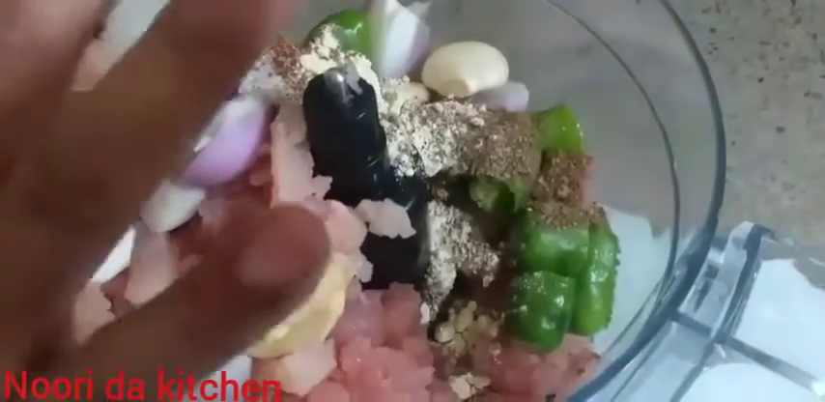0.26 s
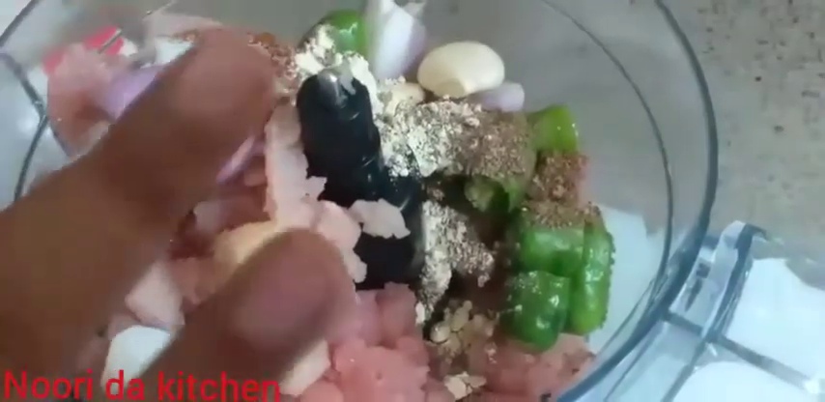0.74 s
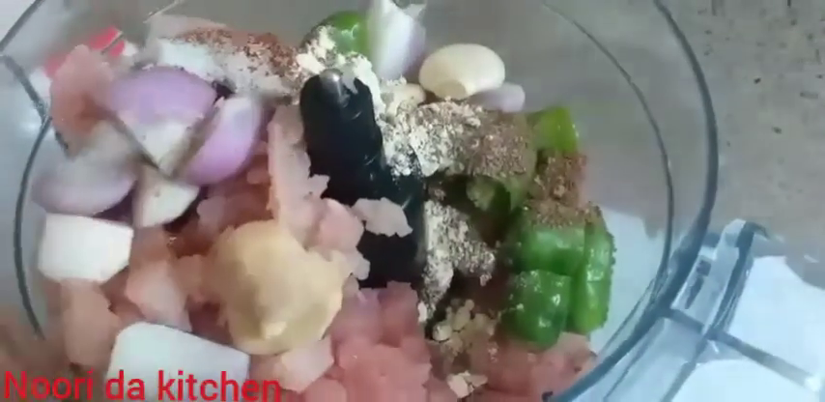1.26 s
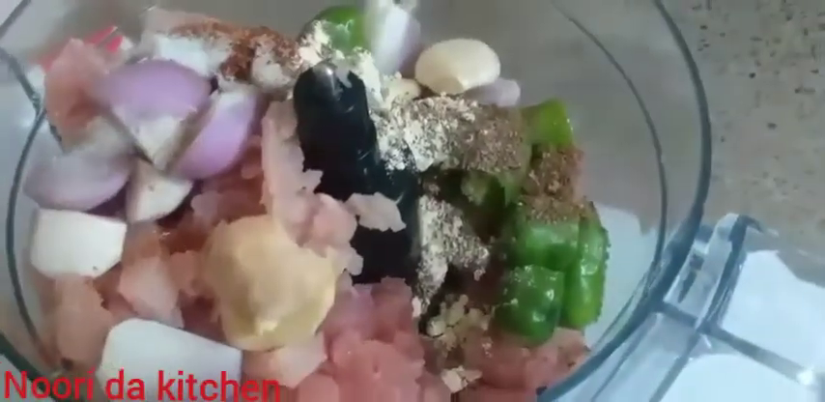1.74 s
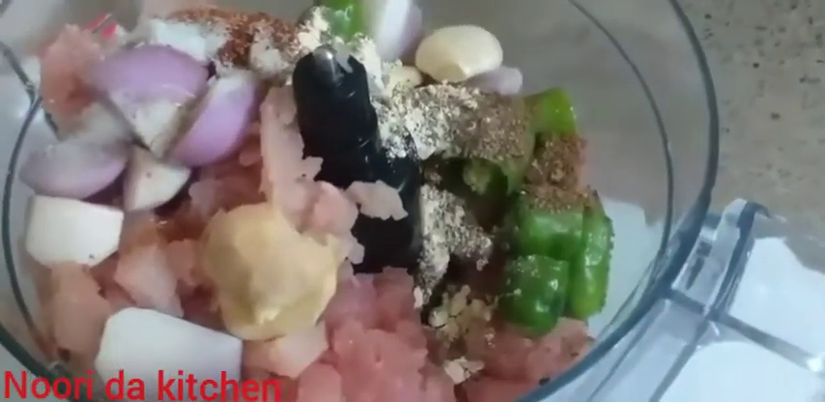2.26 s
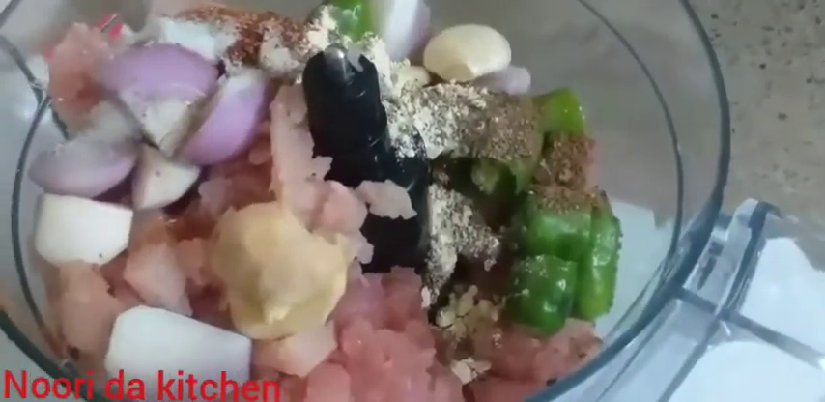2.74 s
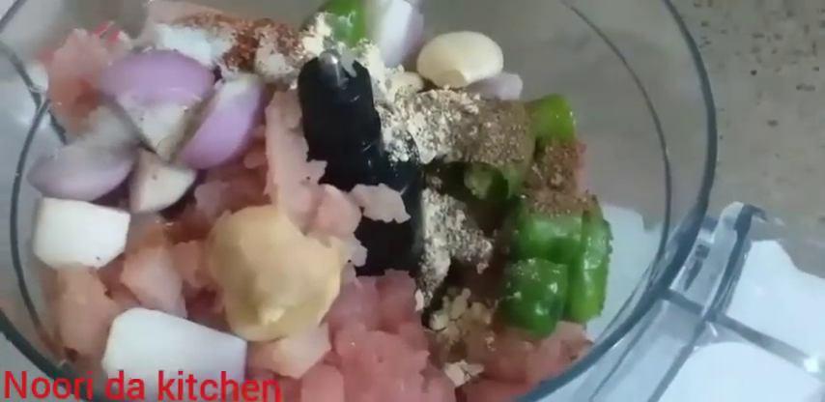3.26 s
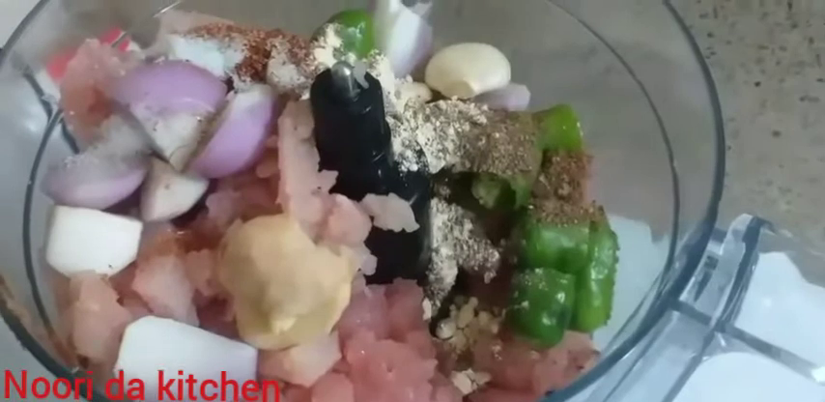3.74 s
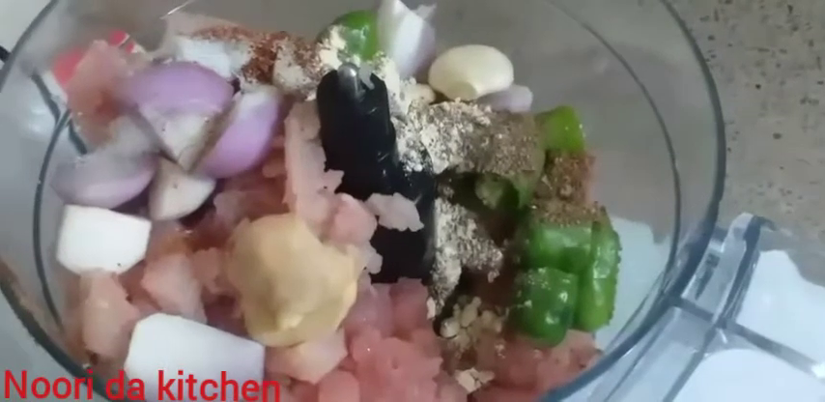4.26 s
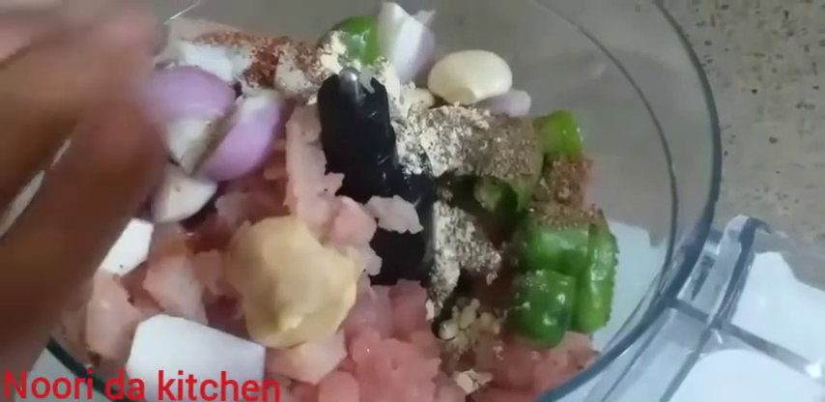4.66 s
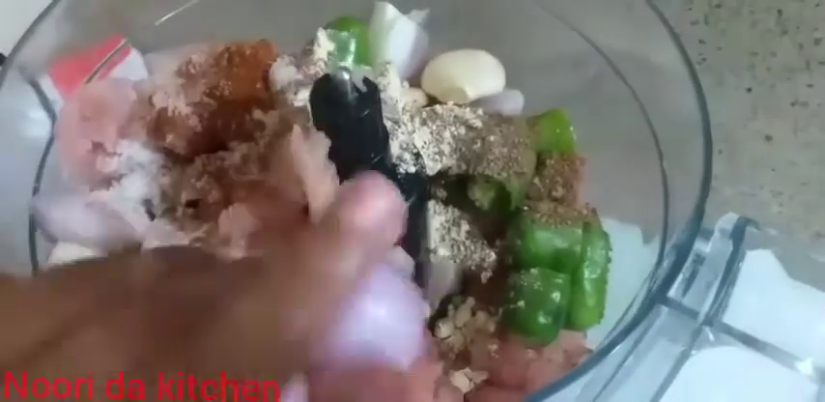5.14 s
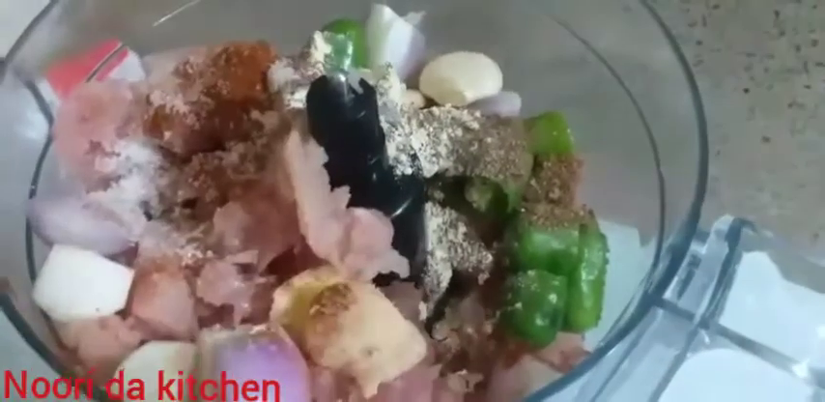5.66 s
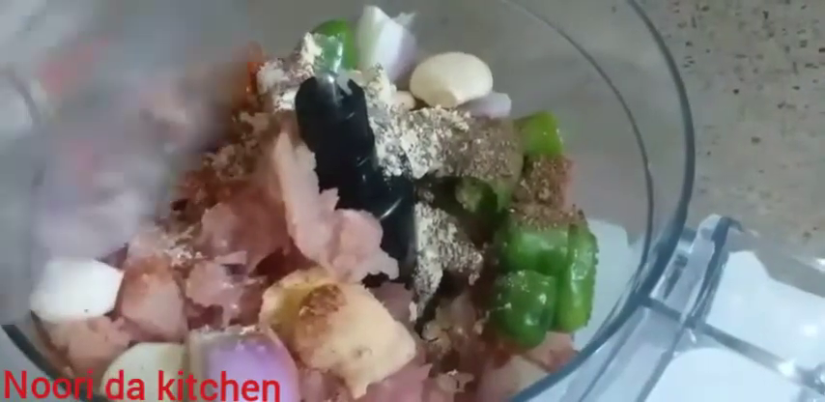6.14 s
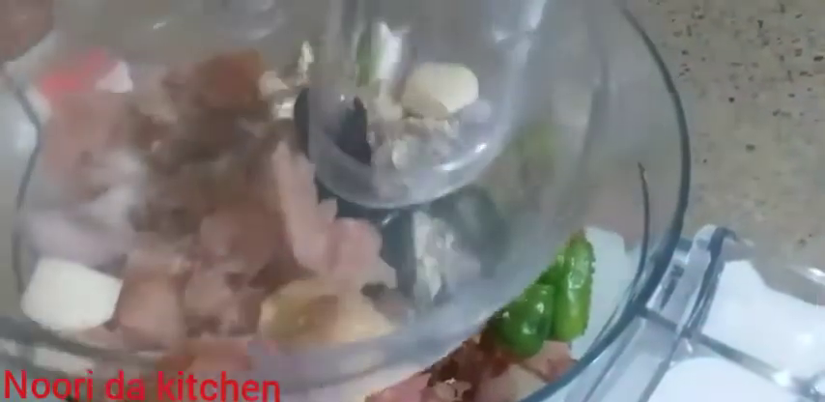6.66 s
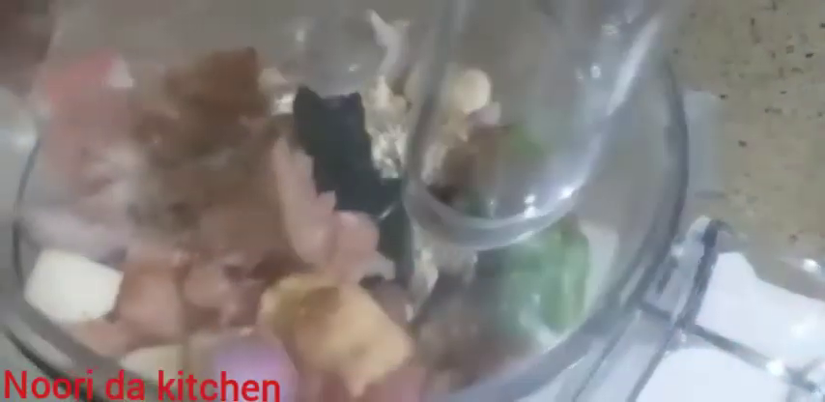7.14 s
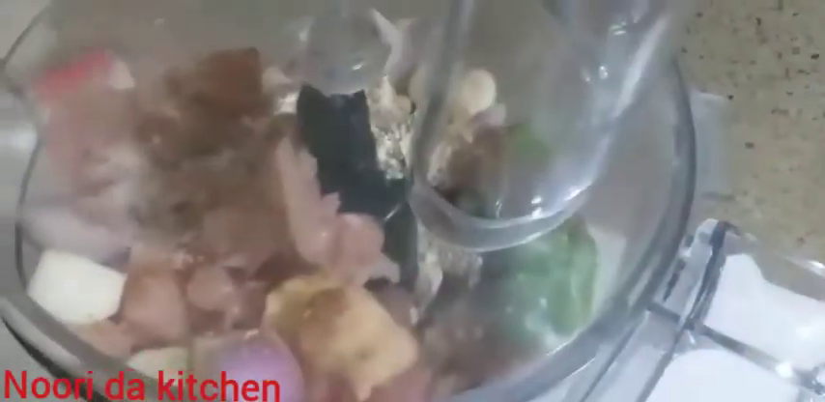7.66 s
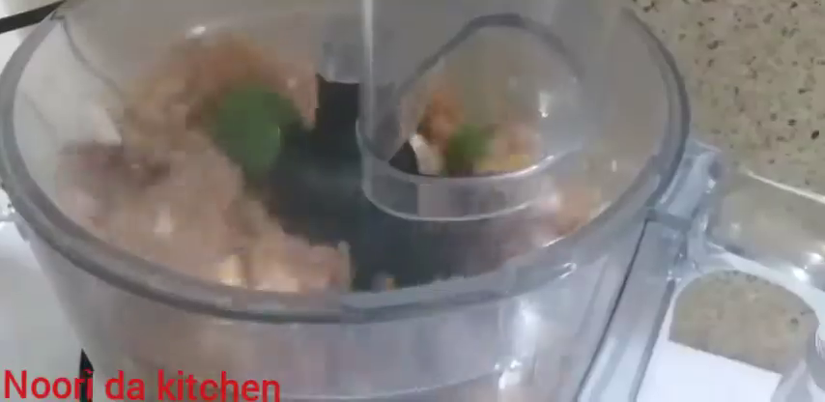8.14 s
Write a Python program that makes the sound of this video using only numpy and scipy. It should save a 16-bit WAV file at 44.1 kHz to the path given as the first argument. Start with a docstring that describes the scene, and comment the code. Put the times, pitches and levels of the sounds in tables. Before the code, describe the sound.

Fingers press wet chopped meat and onion, a dish and spoon clink, a plastic lid knocks shut, then a food processor motor roars.

```python
"""A food processor in a hard-walled kitchen, heard from just above its plastic bowl. After a brief silence the
scene changes to its motor running: shaft hum and gear tones under the noise roar of blades in food. Before the
change, fingers press wet meat and onion (crackle, rub, hollow plops), a dish and a spoon ring as decaying
modes, and noise bursts through resonances knock the lid shut. A small container slides on the counter over
filtered hiss, rumble and a distant engine's low tones."""
import sys
import numpy as np
from scipy import signal
from scipy.fft import rfft, irfft, next_fast_len
from scipy.io import wavfile
from scipy.ndimage import uniform_filter1d, minimum_filter1d, map_coordinates

SR = 44100
rng = np.random.default_rng(int(sys.argv[2]) if len(sys.argv) > 2 else 0)


def waveform_to_disk(signal):
    """Save audio, clipped to [-1, 1], as 16-bit WAV at the path in sys.argv[1]."""
    frames = np.transpose(np.atleast_2d(signal))
    scaled = np.clip(frames, -1, 1) * 32767
    samples = np.round(scaled).astype(np.int16)
    wavfile.write(sys.argv[1], SR, samples)


N = 370131  # samples

# Levels of spectra, modes and tones are relative within their table.
# roar of blades, gears and fan: pitch_hz, level_db
GRIND_SPECTRUM = [(290, -42.5), (500, -35.5), (678, -11.5), (773, -12), (1060, -2.5), (1210, -8.5),
                  (1690, -1.5), (1930, -4), (2850, -1.5), (3290, -1.5), (3700, 1), (5800, 1.5),
                  (8580, -35.5), (15100, -29), (16000, -25)]
# noise of the shaken housing: pitch_hz, level_db
HOUSING_SPECTRUM = [(24, -62), (40, -36.5), (108, -10), (167, -10), (209, -1), (324, -9.5), (382, -9),
                    (467, -14), (680, -12.5), (800, -38), (1040, -15), (1760, -120)]
# motor and gear tones: pitch_hz, level_db
WHINE_TONES = [(1130, -38), (1830, -35), (2347, -36), (2912, -35), (3268, -38), (3709, -33), (3941, -32),
               (4210, -30), (4479, -35), (5103, -34), (5270, -36), (5480, -36), (5518, -33), (5744, -32),
               (5814, -34), (5900, -33), (6019, -33), (6288, -40)]
# the shaft shakes harder as it takes up the load: start_s, hold_s, level_db
LOAD_SURGES = [(8.07, 0.12, -31)]
SHAFT_HZ, SHAFT_DB, GRIND_DB, WHINE_DB = 207.2, -37.5, -13, 1
SILENCE_S, MOTOR_IN_S = 7.992, 8.0232  # all handling sound stops; after a brief silence the scene changes to the running motor

# fingers pressing the food: start_s, hold_s, squelch_db, push_db, plop_db (relative levels)
PRESSES = [(0.432, 0.035, -39.5, -58, -73), (0.593, 0.036, -41.5, -51, -46.5),
           (0.742, 0.032, -35.5, -44.5, -45), (0.829, 0.058, -44, -58, -67), (0.918, 0.027, -45, -57, -53),
           (1.021, 0.063, -48, -50.5, -47.5), (1.12, .02, -39.5, -54, -47), (1.192, 0.016, -36.5, -55, -42),
           (4.938, 0.022, -47.5, -68, -55.5), (5.021, 0.039, -44, -50.5, -50),
           (5.134, 0.018, -41, -62, -58), (5.163, 0.043, -33, -41, -53), (5.212, .03, -34, -40, -33.5),
           (5.288, 0.091, -37.5, -46, -48), (5.421, .1, -34.5, -52, -46.5),
           (5.565, 0.01, -28.5, -46, -33.5), (5.639, 0.042, -51, -69, -57), (5.871, .05, -37.5, -66, -74),
           (6.323, .03, -36.5, -79, -80), (6.541, .01, -37, -50, -60)]
# crackle of wet food, also the grit under the container: pitch_hz, level_db
SQUELCH_SPECTRUM = [(350, -42.5), (600, -10), (625, -17.5), (790, -21.5), (894, -7), (970, -18),
                    (1210, -13), (2800, -12.5), (3340, -6.5), (5950, 2.5), (8740, -27), (16000, -21)]
# resonances of the air in the bowl: pitch_hz, width_hz, level_db
CAVITY_MODES = [(272, 310, -18.5), (554, 17, 4), (925, 25, -30.5), (1046, 11, -19.5)]
PRESS_ATTACK_S, PRESS_RELEASE_S = 0.023, 0.084  # rise, and fall by 60 dB
# the lid pushing air into the bowl: start_s, level_db
LID_PUFFS = [(6.585, -27), (6.919, -25.5), (6.940, -23.5)]
OPEN_HZ, CLOSED_HZ = 565.7, 440  # the bowl's air resonance without and with the lid
LID_ON_S = 6.8

# the lid knocking on the bowl: start_s, body_db, click_db
LID_KNOCKS = [(6.551, -24, -23.5), (6.607, -31, -17.5), (6.758, -37, -33), (6.882, -42.5, -34.5),
              (6.9191, -28, -26), (7.01, -21, -19), (7.023, -36, -26.5), (7.375, -47, -33.5),
              (7.403, -42, -36)]
# the lid juddering along the rim: start_s, length_s, body_db, click_db
LID_TWISTS = [(6.567, .03, -30.5, -37.5), (6.957, .042, -25, -26.5)]
# time from slip to slip, its scatter as a share, scatter in strength
SLIP_S, SLIP_SCATTER, SLIP_SCATTER_DB = .011, .2, 1.5
# the lid hits its stop and jolts the whole machine: start_s, hold_s, level_db
LOCK_JOLTS = [(7.013, 0.01, -31.5)]
# noise of that jolt: pitch_hz, level_db
JOLT_SPECTRUM = [(25, -39), (65, -9), (115, 5), (190, -5), (300, -29), (900, -84)]
# colour of plastic knocks: pitch_hz, level_db
PLASTIC_SPECTRUM = [(35, -60), (60, -28), (113, -4), (172, -13), (294, -4), (338, -20), (427, -6.5),
                    (785, -11.5), (1660, -2), (1820, -10.5), (2470, -14.5), (2710, -12.5), (6280, -6),
                    (9350, -37), (16000, -32.5)]
# resonances of the lid: pitch_hz, width_hz, level_db
LID_MODES = [(301.4, 21, 1.5), (446, 50, -1.5), (966, 78, 6), (1205, 33, 9), (1316, 65, 3.5), (1624, 32, 2),
             (2150, 31, -11), (2336, 24, 4.5), (2517, 41, 4), (3300, 32, 12.5), (3800, 75, -16)]
THUD_LOW_HZ = 225  # the light lid alone gives no deeper sound

# the dish touching down: start_s, level_db, low_db (added to its modes under 4 kHz)
DISH_CLINKS = [(2.032, -16, -6.5), (2.0451, -10, 2.5), (2.061, -20.5, 7.5), (2.115, -27, -9),
               (2.191, -26.5, -4), (2.1973, -21, -9), (2.2403, -24.5, 2), (2.2671, -25, -11),
               (2.463, -21.5, -5), (2.477, -16, -3), (2.609, -26, 0)]
# the spoon dropping: start_s, level_db
SPOON_DROPS = [(2.687, -20.5), (2.692, -13.5)]
# free modes of dish and spoon, before the damping factor: pitch_hz, width_hz, level_db
DISH_MODES = [(1206, 19, -6.5), (1830, 8.7, -7), (2215, 44, -12.5), (2834, 37, 1), (3526, 68, -4.5),
              (4270, 73, -23), (4540, 46, -6), (4886, 73, 5.5), (5810, 78, -8), (5680, 100, -23.5),
              (6210, 56, -1.5), (6660, 50, -5.5), (7670, 170, -33), (9630, 58, -28.5), (11400, 37, -42),
              (11000, 210, -41)]
SPOON_MODES = [(1807, 47, -10.5), (2252, 15, -5), (2932, 37, -16.5), (3210, 26, -5), (3477, 54, 1),
               (4565, 45, -0.5), (4600, 35, -9), (5300, 38, -16), (6050, 13, 3.5), (6230, 38, -14.5),
               (6610, 190, -3.5), (9100, 59, -27.5)]
# the dish's faint top partials: pitch_hz, width_hz, level_db
DISH_SPARKLE = [(7680, 81, 9), (8400, 36, -4.5), (9720, 39, -7), (10700, 37, -15.5), (11700, 61, -4),
                (14000, 60, -6)]
# the spoon's longest partials: pitch_hz, width_hz, level_db
SPOON_SUSTAIN = [(3350, 5.4, 3), (4460, 2, -1.5), (6100, 7, -8.5)]
# noise at the contact: pitch_hz, level_db
CLASH_SPECTRUM = [(59, -58.5), (100, -25.5), (255, -14), (648, -19), (1170, -7.5), (2000, -9.5),
                  (2220, -8.5), (2630, -6.5), (3540, -9), (4110, -5), (4870, 2), (5420, -9), (6290, -11),
                  (7610, -25.5), (16000, -43)]
SPOON_RATTLE_DB, DISH_RATTLE_DB = -16, -16  # each one shaken by a blow of the other
PRESS_HZ_PER_S = 210  # the dish's pitch rises as it is pressed onto the counter
# the dish's rim grinding round: start_s, hold_s, level_db
RIM_ROLLS = [(2.51, 0.024, -29), (2.67, 0.017, -33.5)]
# resonances of the grinding rim: pitch_hz, width_hz, level_db
RIM_MODES = [(1320, 120, 1), (1562, 74, 0)]

# hard taps, the last one the switch: start_s, peak_db (before the room), pitch_hz, width_hz, room_db
TAPS = [(0.14, -14.5, 1986, 990, -4), (0.14, -18.5, 5550, 4500, 1), (1.211, -27.5, 2280, 2490, -5.5),
        (7.9632, -24, 3610, 1300, -32)]
# wet pieces snapping: start_s, peak_db (before the room)
SNAPS = [(1.137, -30.5), (1.420, -33.5), (1.4787, -28.5), (4.748, -24), (5.329, -22.5), (5.486, -25),
         (5.5651, -15.5), (5.807, -19), (5.822, -18.5), (5.896, -28)]
SNAP_HZ, SNAP_WIDTH_HZ, SNAP_ROOM_DB = 5620, 4100, -6.5
# a thin container sliding over the counter: start_s, hold_s, level_db
SLIDES = [(4.096, 0.062, -40), (4.24, .01, -45)]
# resonances of its wall: pitch_hz, width_hz, level_db
CONTAINER_MODES = [(956, 15, 10.5), (1270, 51, -5), (2476, 56, 0.5), (3710, 50, 6), (5480, 36, 2),
                   (6900, 91, 3.5)]

# room background: start_s, hiss_db, rumble_db
FLOOR_LEVELS = [(0, -48.5, -56), (1.4, -50.5, -62.5), (2.3, -53, -65), (3.2, -57.5, -76.5),
                (3.6, -59, -70.5), (4.1, -52, -60), (6.2, -50.5, -63), (7.3, -50.5, -52.5),
                (7.9, -53, -63.5)]
# colours of the hiss and the rumble: pitch_hz, level_db
HISS_SPECTRUM = [(180, -32.5), (300, -11.5), (337, -21), (385, -20), (519, -32.5), (725, -11.5),
                 (1230, -19), (1510, -7), (2140, -15.5), (3640, 0.5), (3950, -4), (5160, 0.5), (6850, -6),
                 (9240, -35), (16000, -10.5)]
RUMBLE_SPECTRUM = [(15, -71), (25, -25.5), (114, 2.5), (183, -12.5), (245, -9), (339, -24.5), (452, -22),
                   (500, -21), (650, -59), (1100, -120)]
# a distant engine idling: start_s, firing_hz, fourth_order_db, fifth_order_db
ENGINE_DRONE = [(0, 24.65, -69, -53.5), (.3, 24.74, -82, -46.5), (1.0, 26, -56.5, -69.5),
                (1.9, 26, -57.5, -65.5), (2.7, 25.8, -73.5, -72.5)]
# the engine's weaker orders: multiple of firing_hz, level_db (against the stronger of the two main orders)
ENGINE_ORDERS = [(6, -9), (9, -12.5), (10, -8.5)]
# decay of the kitchen's reverberation: pitch_hz, t60_s
KITCHEN_DECAY = [(150, 1), (400, 0.87), (1000, 0.97), (2800, 0.89), (7000, 0.42), (14000, 0.51)]
# stereo side signal against the mid: pitch_hz, level_db
STEREO_WIDTH = [(100, -50), (2500, -71.5), (5000, -65.5), (7000, -45), (9000, -29), (13000, -37.5)]
TOP_HZ = 15900  # band limit


def amp(db):
    """Decibels to a linear gain."""
    return 10 ** (np.asarray(db) / 20)


def unit(x):
    """Scaled to rms 1."""
    return x / np.sqrt(np.mean(x ** 2) + 1e-20)


def onset_unit(x, size=660):
    """Scaled to rms 1 over its first 15 ms."""
    return x / np.sqrt(np.mean(x[:size] ** 2) + 1e-20)


def clock(count):
    """Time in seconds of each sample."""
    return np.arange(count) / SR


def along(points, hz):
    """(Hz, value) points read on a log frequency axis."""
    f, v = np.transpose(points)
    return np.interp(np.log(hz + 1), np.log(f + 1), v)


def curves(rows):
    """One value per sample for each column after the time."""
    s, *cols = np.transpose(rows)
    return [np.interp(clock(N), s, c) for c in cols]


def wobble(rate):
    """A smooth random curve, rate knots a second."""
    knots = rng.standard_normal(int(N * rate / SR) + 4)
    return map_coordinates(knots, [np.arange(N) * rate / SR], order=2)


def filtered(x, response):
    """x times a complex response of frequency."""
    m = next_fast_len(x.shape[-1] + 8192)
    return irfft(rfft(x, m) * response(np.fft.rfftfreq(m, 1 / SR)), m)[..., :x.shape[-1]]


def coloured(x, spectrum, size=2048):
    """x through a causal, minimum-phase filter with the given (Hz, dB) shape."""
    gain = amp(along(spectrum, np.fft.rfftfreq(size, 1 / SR)))
    cepstrum = irfft(np.log(gain + 1e-6))
    fold = np.r_[1, np.full(size // 2 - 1, 2), np.zeros(size // 2)]
    impulse = irfft(np.exp(rfft(cepstrum * fold)))
    return signal.oaconvolve(x, impulse)[:len(x)]


def resonant(x, peaks):
    """x through a body's (Hz, width, dB) resonances, summed with alternating signs."""
    def response(f):
        total = 0
        for k, (c, w, db) in enumerate(peaks):
            total = total + (-1) ** k * amp(db) * 1j * f * w / (c * c - f * f + 1j * f * w)
        return total
    return filtered(x, response)


def band(x, edges_hz, kind):
    """x through a third-order band or high-pass filter."""
    return signal.sosfilt(signal.butter(3, edges_hz, kind, fs=SR, output='sos'), x)


def noise(spectrum):
    """Unit-level noise with the given colour."""
    return unit(coloured(rng.standard_normal(N), spectrum))


def burst(t60, rise):
    """The chatter of one contact: noise that rises fast and dies 60 dB in t60 seconds."""
    t = clock(SR // 2)
    return rng.standard_normal(len(t)) * amp(-60 * t / t60) * (1 - np.exp(-t / rise))


def grains(rate, spread_db):
    """Random impulses of widely varying size, rate a second on average."""
    size = amp(spread_db * np.minimum(rng.exponential(size=N), 3))
    return (rng.random(N) < rate / SR) * rng.choice([-1, 1], N) * size


def ring(modes, shift_hz, scatter_db, damping, count=SR // 2):
    """Free ringing, with new mode strengths for every blow; wider modes die sooner."""
    t = clock(count).astype('float32')
    out = np.zeros(len(t))
    for hz, width, db in modes:
        swing = np.sin(float(2 * np.pi * (hz + shift_hz)) * t + 2 * np.pi * rng.random())
        decay = np.exp(-float(np.pi * damping * width) * t)
        out += width * amp(db + scatter_db * rng.normal()) * decay * swing
    return out


def strokes(rows, attack_s, release_s):
    """Gain of (s, hold s, dB) gestures: each swells up to its time, holds, and falls 60 dB over the release."""
    t, out = clock(N), np.zeros(N)
    for s, hold_s, db in rows:
        near = slice(*np.searchsorted(t, [s - attack_s, s + hold_s + release_s]))
        u = t[near] - s
        swell = np.minimum(1 + u / attack_s, 1) ** 2
        fall_db = -60 * np.maximum(u - hold_s, 0) / release_s
        out[near] = np.maximum(out[near], swell * amp(db + fall_db))
    return out


def add(track, s, x):
    """Mix x into the track at s seconds."""
    part = track[round(s * SR):][:len(x)]
    part += x[:len(part)]


def echo(x, wet_db):
    """x plus the kitchen's answer, each frequency dying at its own speed."""
    hz, t, z = signal.stft(rng.standard_normal(SR), SR, nperseg=256)
    decay = amp(-60 * t / along(KITCHEN_DECAY, hz)[:, None])
    tail = signal.istft(z * decay, SR, nperseg=256)[1]
    tail = tail * (1 - np.exp(-(clock(len(tail)) / 0.0028) ** 2))  # builds up over some milliseconds
    room = amp(wet_db) * tail / np.linalg.norm(tail)
    room[0] = 1  # the direct sound
    return signal.fftconvolve(x, room)[:N]


def motor():
    """The shaft hums and shakes the housing; gears whine over the roar of blades hitting food."""
    run = np.cumsum(1 + .0017 * wobble(14)) / SR  # the load nudges the speed of every tone alike
    whine = np.zeros(N)
    for hz, db in WHINE_TONES:
        whine += amp(db + 2 * wobble(12)) * np.sin(2 * np.pi * (hz * run + rng.random()))
    chop = unit(coloured(grains(rate=7000, spread_db=2.5), GRIND_SPECTRUM))
    roar = unit(noise(GRIND_SPECTRUM) + chop) * amp(1.3 * wobble(70))
    shake = amp(SHAFT_DB) + strokes(LOAD_SURGES, attack_s=.08, release_s=0.18)
    hum = shake * np.sin(2 * np.pi * SHAFT_HZ * run)
    housing = amp(-28.5) * band(noise(HOUSING_SPECTRUM), 60, 'high')
    running = clock(N) > MOTOR_IN_S
    return (amp(GRIND_DB) * roar + amp(WHINE_DB) * whine + hum + housing) * running


def food():
    """Wet pieces crackle and rub under each press of the fingers."""
    squelches = [(s, hold_s, db) for s, hold_s, db, _, _ in PRESSES]
    pushes = [(s, hold_s, db) for s, hold_s, _, db, _ in PRESSES]
    wet = strokes(squelches, PRESS_ATTACK_S, PRESS_RELEASE_S)
    push = strokes(pushes, PRESS_ATTACK_S, PRESS_RELEASE_S)
    crackle = unit(coloured(grains(rate=1000, spread_db=1.0), SQUELCH_SPECTRUM))
    crackle = crackle * amp(1.4 * wobble(45) - 3.0)
    rub = noise([(150, -9.5), (250, -1), (320, -1.5), (420, -13.5), (560, -13.5), (1200, -4)])
    rub = unit(resonant(rub, CAVITY_MODES))
    return echo(wet * crackle + amp(-2.5) * push * rub, wet_db=-3.5)


def bowl_air():
    """Each push of fingers or lid makes a hollow plop; the closed lid lowers its pitch."""
    out, t = np.zeros(N), clock(SR // 2)
    envelope = (1 - np.exp(-(t / 0.0063) ** 2)) * amp(-60 * t / 0.15)
    for s, *_, db in PRESSES + LID_PUFFS:
        hz = OPEN_HZ if s < LID_ON_S else CLOSED_HZ
        add(out, s, amp(db) * onset_unit(np.sin(2 * np.pi * hz * t) * envelope))
    return echo(out, wet_db=-12.5)


def slips():
    """A twisted lid sticks and slips at an uneven rate: rows like those of the knocks."""
    rows = []
    for start, length_s, body_db, click_db in LID_TWISTS:
        for k, (late, strong) in enumerate(rng.standard_normal(size=(8, 2))):
            if k * SLIP_S < length_s:
                s = start + SLIP_S * (k + SLIP_SCATTER * late)
                change_db = SLIP_SCATTER_DB * strong
                rows.append((s, body_db + change_db, click_db + change_db))
    return rows


def knocks():
    """Each knock is a hollow thud, a clack of the thin walls and a short bright click; locking adds a deep jolt."""
    jolt = strokes(LOCK_JOLTS, attack_s=.005, release_s=0.11) * noise(JOLT_SPECTRUM)
    out = echo(jolt, wet_db=-3)
    for s, body_db, click_db in LID_KNOCKS + slips():
        body = onset_unit(coloured(burst(t60=0.094, rise=0.0019), PLASTIC_SPECTRUM))
        body = body + amp(-2) * onset_unit(resonant(burst(t60=0.027, rise=0.0013), LID_MODES))
        thud = amp(body_db + 0.36) * onset_unit(band(body, [THUD_LOW_HZ, 940], 'band'))
        wall = amp(body_db - 0.9) * onset_unit(band(body, [750, 2700], 'band'))
        bright = band(coloured(burst(t60=0.031, rise=0.001), PLASTIC_SPECTRUM), 3100, 'high')
        click = amp(click_db) * onset_unit(bright)
        add(out, s, echo(thud + wall + click, wet_db=-5.5))
    return out


def clatter():
    """The dish, damped by the counter, rattles to rest; the spoon drops last and rings on."""
    out = np.zeros(N)
    seating = 1 - np.exp(-clock(SR // 2) / .0009)  # a rim meets the counter gradually
    blows = []  # start_s, dish_db, spoon_db, shift_hz, low_db
    for s, db, low_db in DISH_CLINKS:
        shift_hz = PRESS_HZ_PER_S * (s - DISH_CLINKS[0][0])
        blows.append((s, db, db + SPOON_RATTLE_DB, shift_hz, low_db))
    for s, db in SPOON_DROPS:
        blows.append((s, db + DISH_RATTLE_DB, db, 0, 0))
    for s, dish_db, spoon_db, shift_hz, low_db in blows:
        # glancing blows miss the low modes
        modes = [(hz, width, db + low_db * (hz < 4000)) for hz, width, db in DISH_MODES]
        dish = onset_unit(seating * ring(modes, shift_hz, scatter_db=3.5, damping=0.98))
        sparkle = onset_unit(seating * ring(DISH_SPARKLE, shift_hz, scatter_db=3, damping=1.3))
        dish += amp(-28) * sparkle
        spoon = onset_unit(seating * ring(SPOON_MODES, 0, scatter_db=0.5, damping=1.0))
        crack = onset_unit(coloured(burst(t60=.045, rise=.001), CLASH_SPECTRUM))
        crack = np.hypot(amp(dish_db), amp(spoon_db)) * crack
        hit = amp(dish_db) * dish + amp(spoon_db - 1.5) * spoon + amp(-5.5) * crack
        add(out, s, echo(hit, wet_db=-2.5))
        sustain = ring(SPOON_SUSTAIN, 0, scatter_db=1.5, damping=0.95, count=SR)
        add(out, s, amp(spoon_db - 12.0) * onset_unit(sustain))
    rim = unit(resonant(resonant(rng.standard_normal(N), RIM_MODES), RIM_MODES))
    return out + strokes(RIM_ROLLS, attack_s=0.034, release_s=0.46) * rim


def ticks():
    """Short taps and snaps, each a noise burst around one pitch; those close to the microphone are drier."""
    out = np.zeros(N)
    snaps = [(s, db, SNAP_HZ, SNAP_WIDTH_HZ, SNAP_ROOM_DB) for s, db in SNAPS]
    for s, db, hz, width_hz, room_db in TAPS + snaps:
        tone = [(hz, width_hz, 0)]
        snap = resonant(resonant(burst(t60=0.024, rise=0.0018), tone), tone)
        snap = coloured(snap, [(300, 8.5), (1500, 2.5), (6500, -3), (8700, -23.5), (16000, -5)])
        add(out, s, echo(amp(db) * snap / np.abs(snap).max(), wet_db=room_db))
    return out


def slide():
    """Gritty friction sets the container's wall singing."""
    grit = unit(coloured(grains(rate=5000, spread_db=2), SQUELCH_SPECTRUM))
    song = unit(resonant(rng.standard_normal(N), CONTAINER_MODES))
    friction = strokes(SLIDES, attack_s=0.012, release_s=0.12)
    return echo(friction * (amp(-1.5) * grit + amp(-6.5) * song), wet_db=-4)


def background():
    """Hiss and low rumble drift in level under the sine orders of a distant engine that fades."""
    hiss_db, rumble_db = curves(FLOOR_LEVELS)
    firing_hz, fourth_db, fifth_db = curves(ENGINE_DRONE)
    cycle = 2 * np.pi * np.cumsum(firing_hz) / SR
    drone = amp(fourth_db) * np.sin(4 * cycle) + amp(fifth_db) * np.sin(5 * cycle)
    strongest_db = np.maximum(fourth_db, fifth_db)
    for multiple, db in ENGINE_ORDERS:
        drone += amp(strongest_db + db + 3 * wobble(4)) * np.sin(round(multiple) * cycle)
    return amp(hiss_db) * noise(HISS_SPECTRUM) + amp(rumble_db) * noise(RUMBLE_SPECTRUM) + drone


def scene():
    """All handling sound stops; after a brief silence the scene changes to the running motor; the sound is
    nearly mono."""
    before = food() + bowl_air() + knocks() + clatter() + ticks() + slide() + background()
    mid = motor() + before * (clock(N) < SILENCE_S)
    side = filtered(mid, lambda hz: 1j * amp(along(STEREO_WIDTH, hz)))  # a quarter cycle out of step
    return np.array([mid + side, mid - side])


def record(dry):
    """A fast limiter holds down the peaks, then everything above the band limit is removed."""
    needed = np.minimum(1, .95 / (np.abs(dry).max(axis=0) + 1e-9))
    gain = uniform_filter1d(minimum_filter1d(needed, size=129), size=129)
    return filtered(dry * gain, lambda hz: hz < TOP_HZ)


dry = scene()
out = record(dry)
waveform_to_disk(out)
```